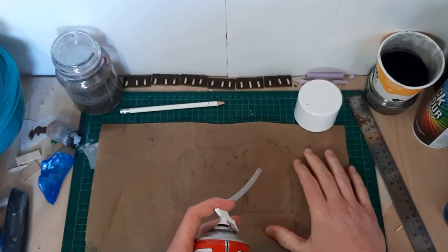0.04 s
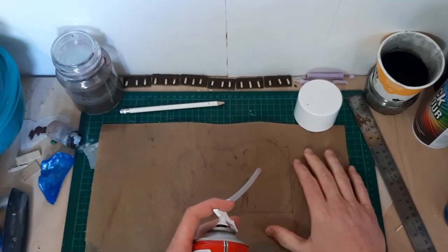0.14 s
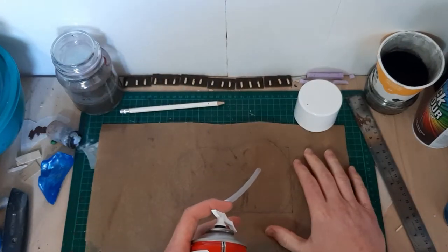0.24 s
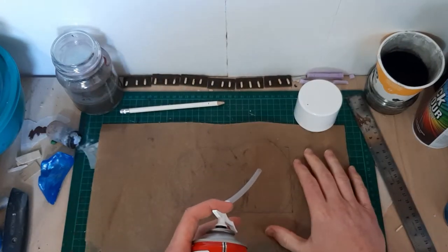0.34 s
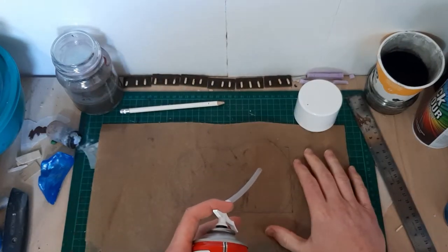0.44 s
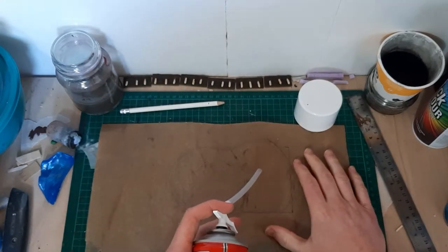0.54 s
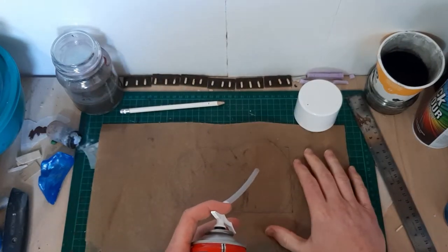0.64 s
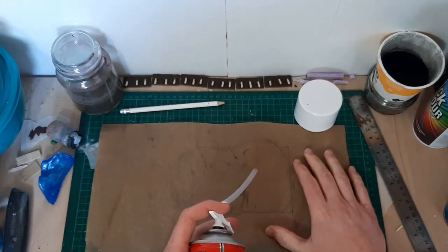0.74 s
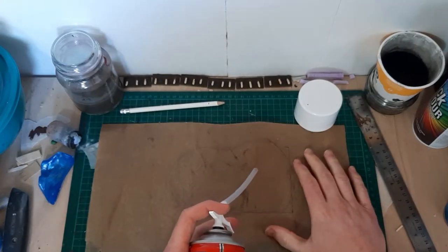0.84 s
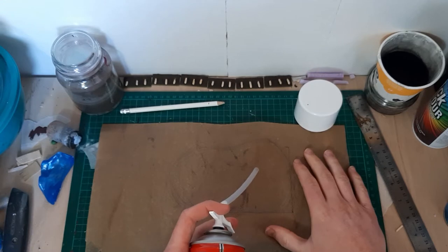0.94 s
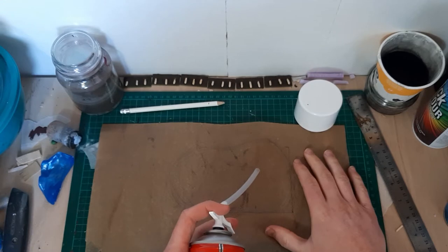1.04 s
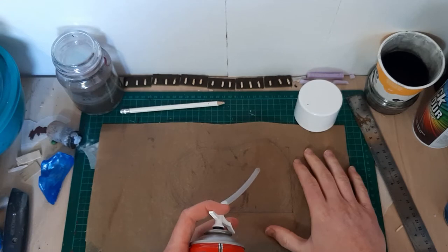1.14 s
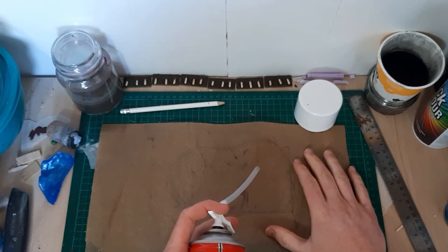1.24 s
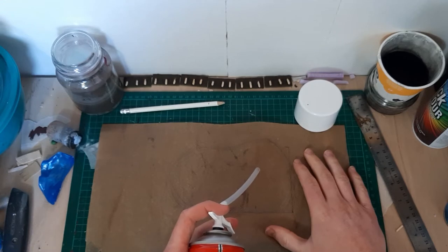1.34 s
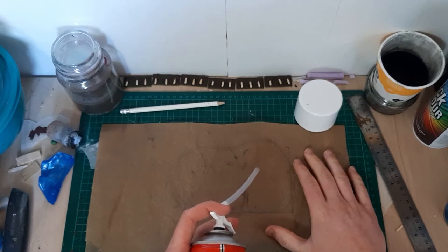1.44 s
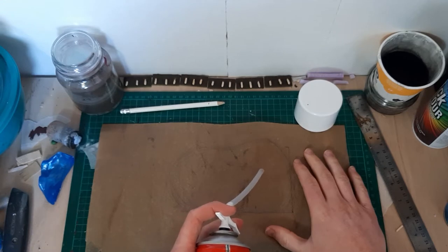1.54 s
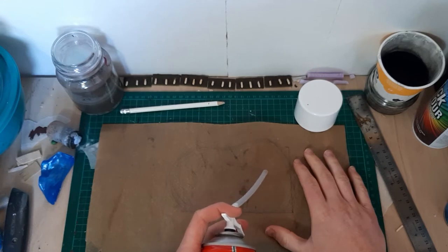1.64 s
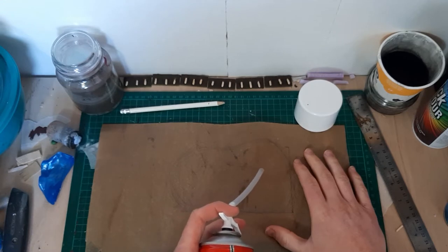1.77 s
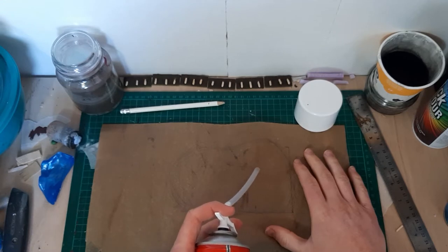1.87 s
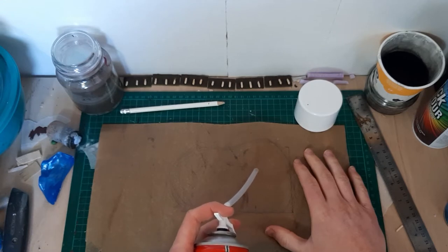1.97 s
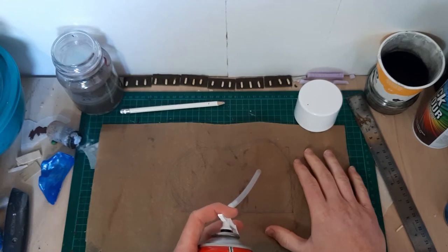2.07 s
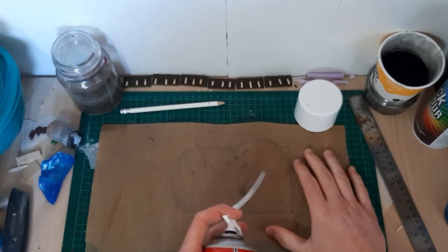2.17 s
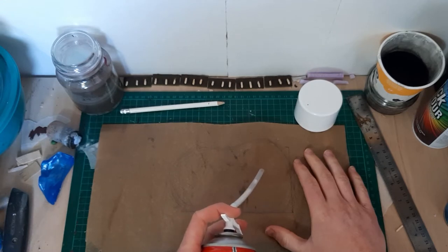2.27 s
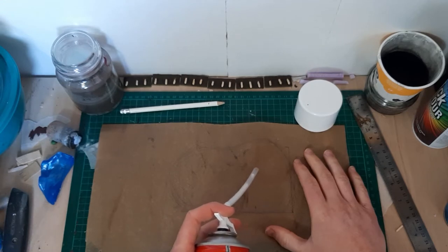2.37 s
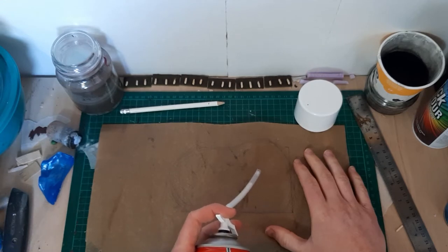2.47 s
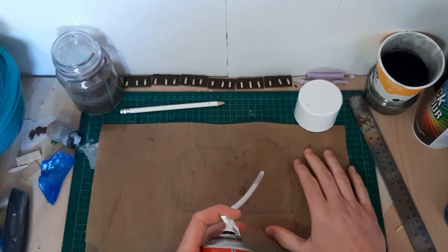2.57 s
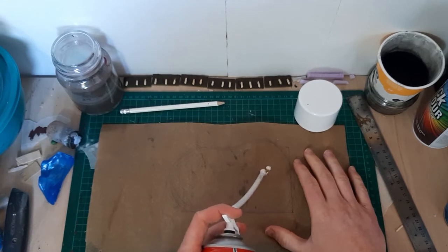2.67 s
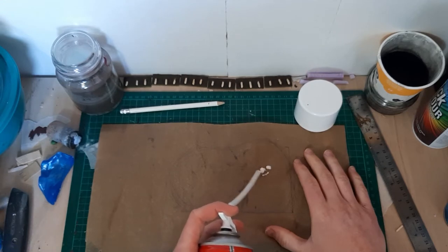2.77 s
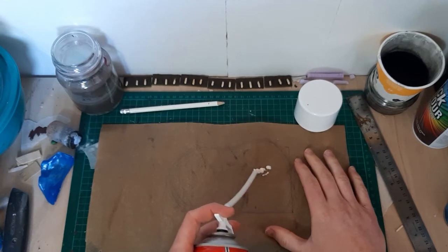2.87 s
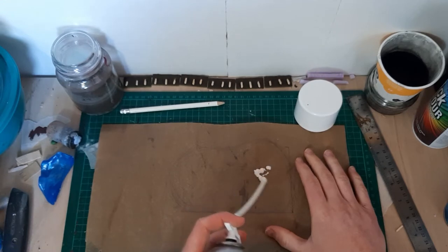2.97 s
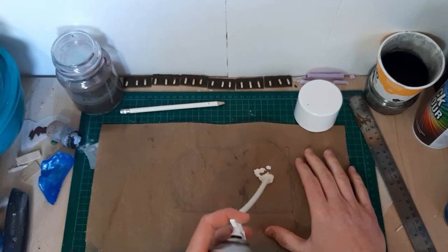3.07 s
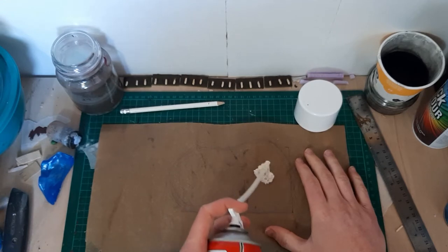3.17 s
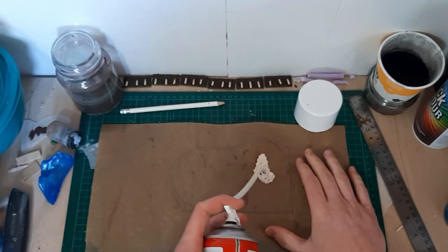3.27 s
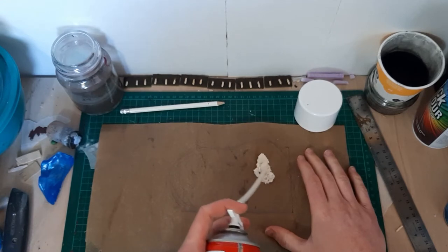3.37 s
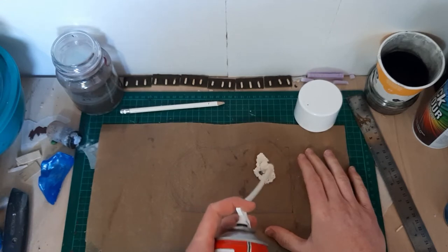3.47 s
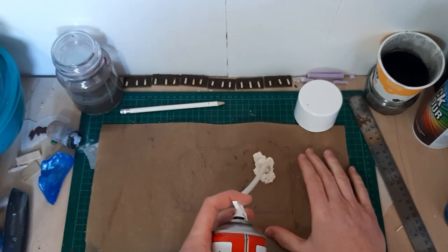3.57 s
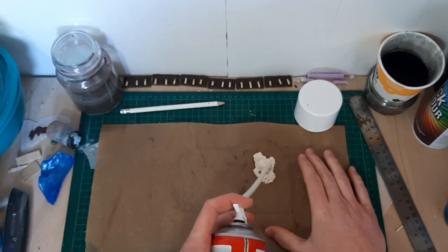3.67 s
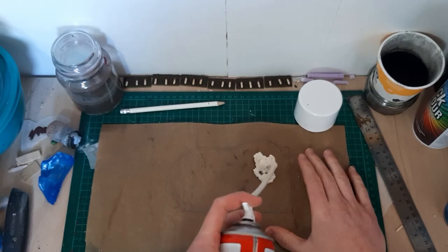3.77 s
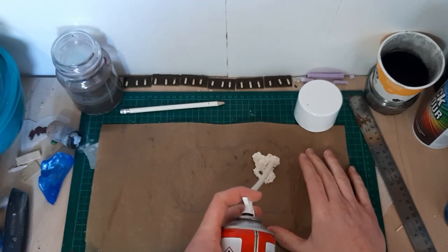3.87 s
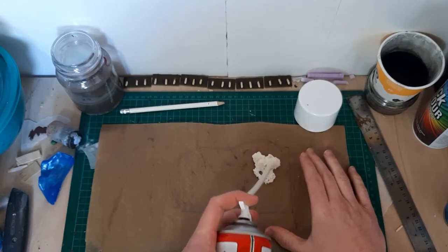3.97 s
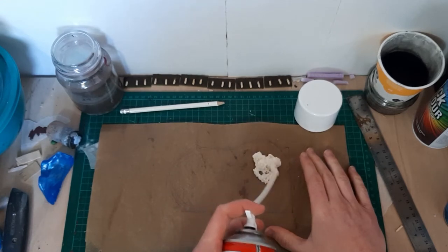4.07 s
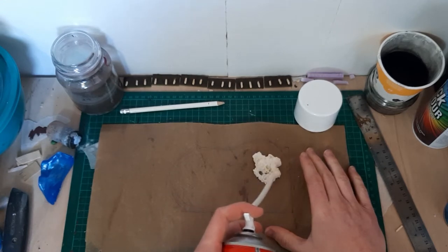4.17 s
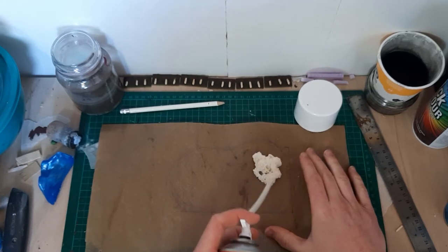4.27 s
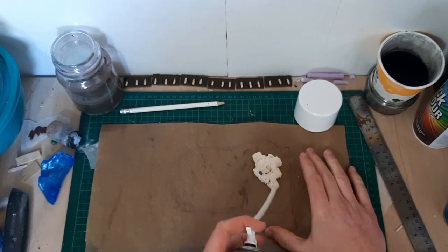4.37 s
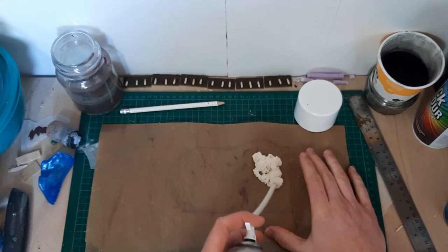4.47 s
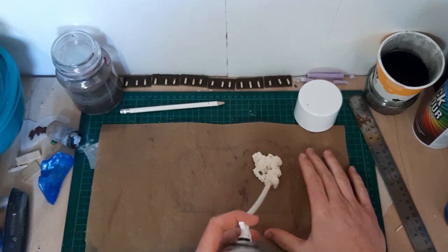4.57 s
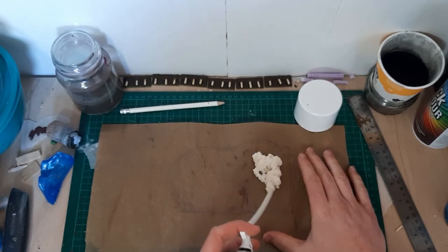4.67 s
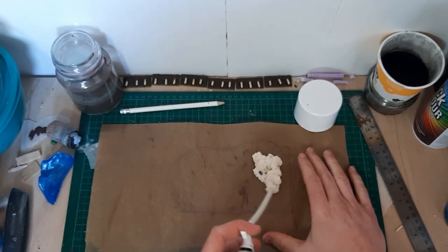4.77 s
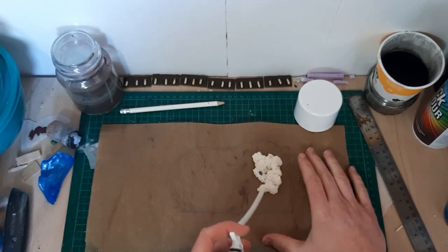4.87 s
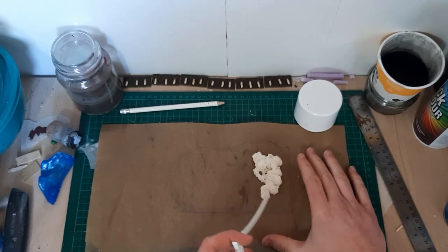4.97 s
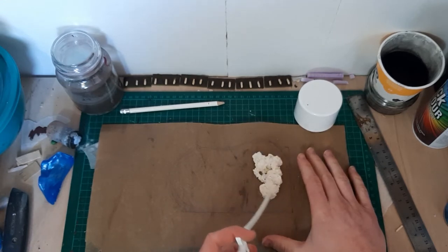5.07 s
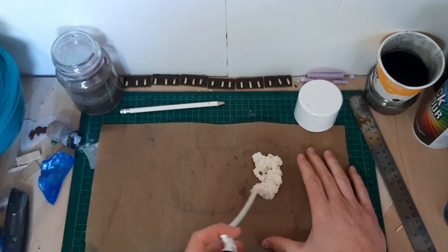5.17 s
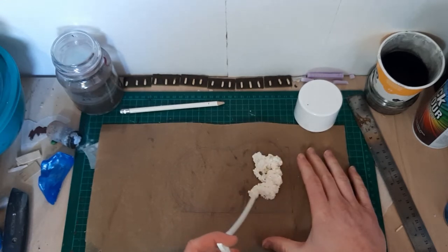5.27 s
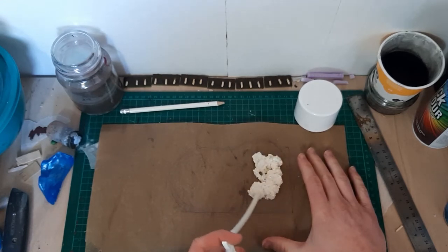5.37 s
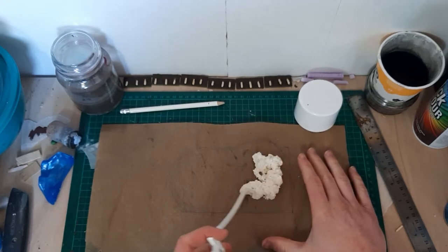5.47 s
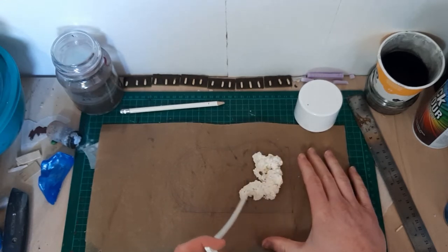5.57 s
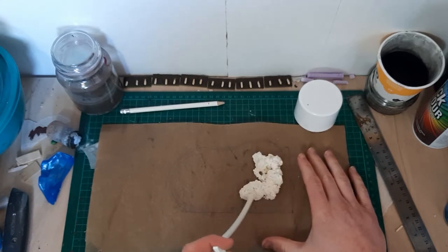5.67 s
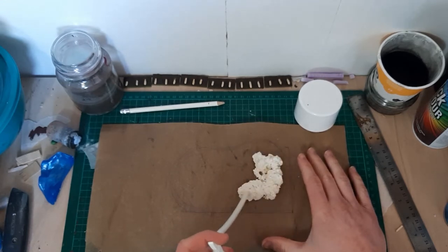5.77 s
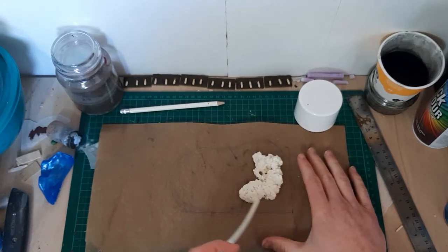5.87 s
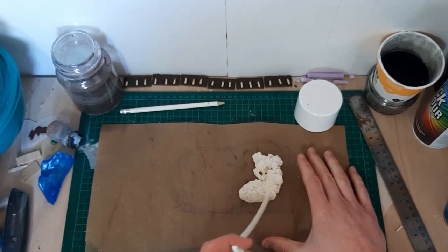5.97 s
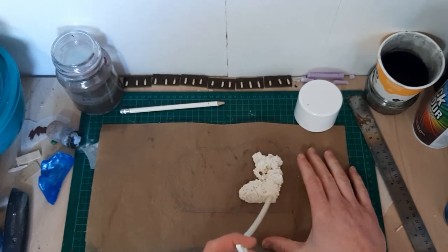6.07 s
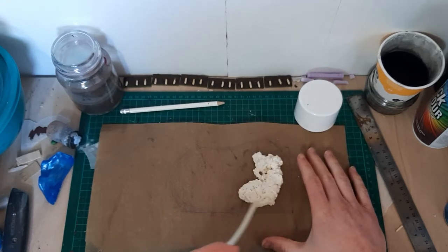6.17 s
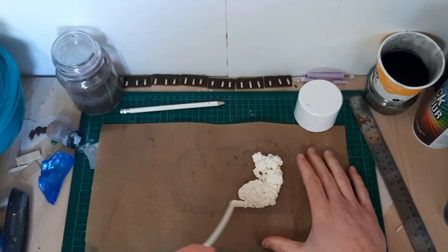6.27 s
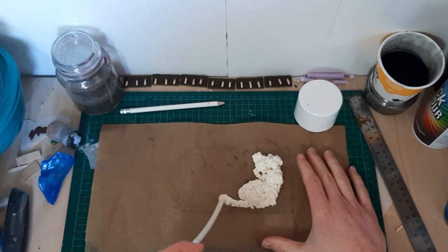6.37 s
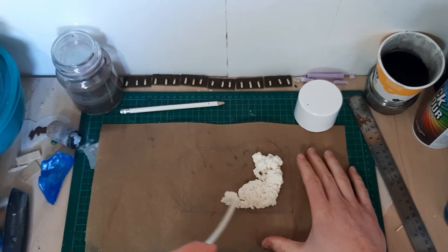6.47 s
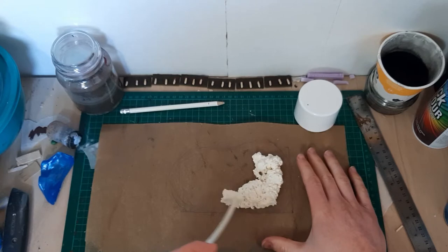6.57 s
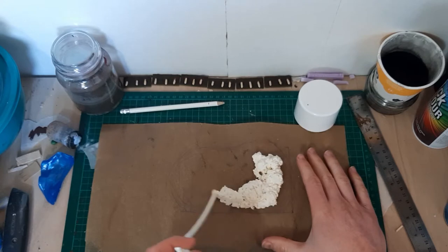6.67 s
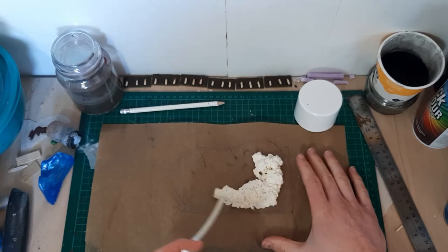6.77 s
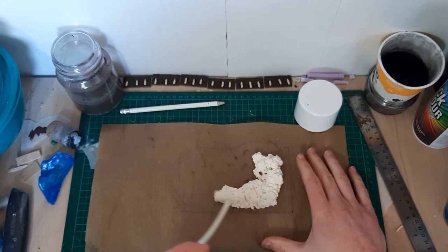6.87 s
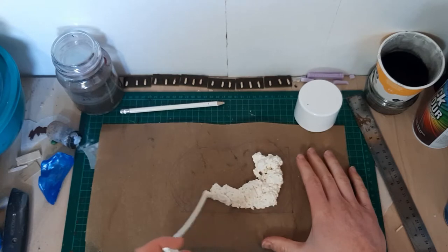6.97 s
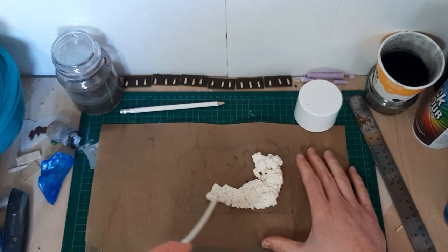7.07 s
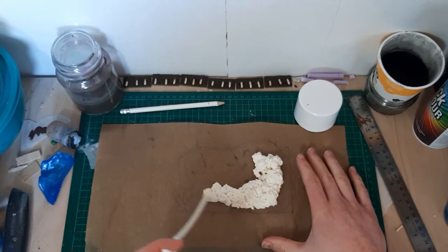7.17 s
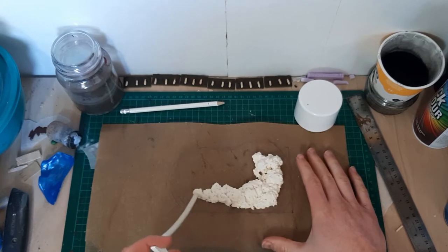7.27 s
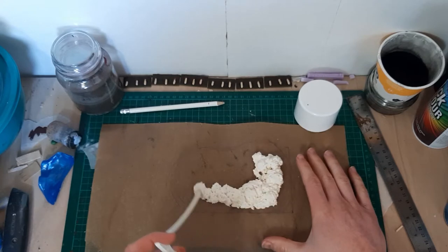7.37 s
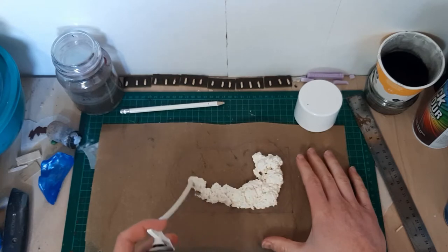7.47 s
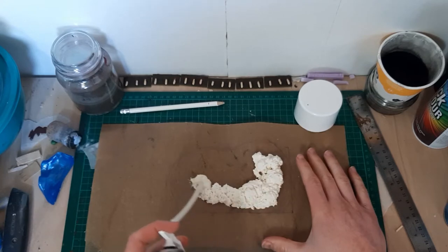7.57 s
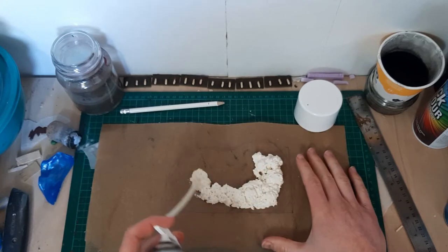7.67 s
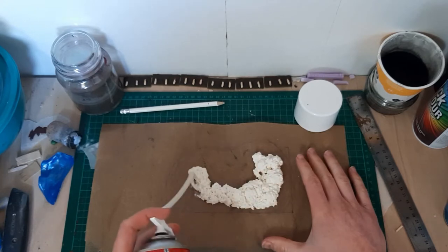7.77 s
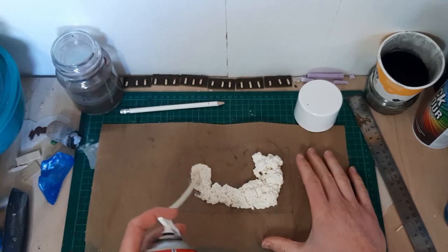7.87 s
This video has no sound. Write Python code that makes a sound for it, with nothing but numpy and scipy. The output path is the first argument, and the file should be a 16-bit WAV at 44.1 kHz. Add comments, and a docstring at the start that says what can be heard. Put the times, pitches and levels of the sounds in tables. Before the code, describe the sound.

Close in a small quiet room, faint low air noise and barely audible chirps are followed by small finger rustles and trigger ticks. Gas starts leaking, the can gives a brief low hum and soft knock, then foam blasts out in a loud sputtering burst. Irregular hissing spurts continue with wet crackles, bubble pops and sharp little snaps, over a seeping hiss, in stereo with a slight lean to the right.

```python
"""A spray can pushes expanding foam through a straw in a small quiet room, over faint air noise.
Faint chirps, modulated sines, come first; grainy rustles and resonant noise are fingers and trigger.
Gas leaks through the straw's resonance; jolts ring the can's low modes, a wavering hum just above them.
Surges of coloured noise carry the hiss, the sputter of bursting pockets and a low rush of foam;
decaying sines are the largest bursts. Noise puffs with clicks, from the first rustle on, are snaps."""
import sys
import numpy as np
from scipy import signal
from scipy.fft import rfft, irfft, next_fast_len
from scipy.io import wavfile
from scipy.ndimage import uniform_filter1d

SR = 44100
rng = np.random.default_rng(int(sys.argv[2]) if len(sys.argv) > 2 else 0)


def unload_audio(sound):
    """Save the sound as a 16-bit wav file, at the path given as the first command line argument."""
    columns = np.transpose(np.atleast_2d(sound))
    # keep every value between -1 and 1, then stretch to whole-number steps
    steps = np.round(np.clip(columns, -1, 1) * 32767)
    wavfile.write(sys.argv[1], SR, steps.astype(np.int16))


N = 349272

# spectrum of small sharp sounds, snaps and rustles: (frequency [Hz], relative density [dB per Hz])
SNAP_SPECTRUM = [(1000, -24), (2000, -2), (2800, 2), (4000, 8.5), (5200, 10), (7000, 8), (8000, 3),
                 (12000, -7), (16000, -10)]


def from_db(db):
    """Amplitude ratio by the decibel law: 20 dB is a factor of ten."""
    return 10 ** (np.asarray(db) / 20)


def rms_one(x):
    """Normalise the root mean square, so that a later gain sets the effective level."""
    return x / np.sqrt(np.mean(x ** 2) + 1e-20)


def in_time(rows):
    """Envelopes by linear interpolation of dB; -120 dB outside, but ends after 7 s are held."""
    times, *columns = np.transpose(rows)
    t = np.arange(N) / SR
    return [np.interp(t, times, column, left=-120, right=column[-1] if times[-1] > 7 else -120)
            for column in columns]


def at_hz(points, hz):
    """Interpolate along log frequency, as the ear spaces pitch."""
    frequencies, values = np.array(points).T
    return np.interp(np.log(hz + 1), np.log(frequencies), values)


def colour(x, spectrum):
    """Linear filtering: multiply the Fourier spectrum by a gain in dB."""
    length = x.shape[-1]
    size = next_fast_len(length + 4096)
    gain = from_db(at_hz(spectrum, np.fft.rfftfreq(size, 1 / SR)))
    return irfft(rfft(x, size) * gain, size)[..., :length]


def drift(corner_hz):
    """Slow random modulation: noise through two equal one-pole low-passes, spread 1."""
    step = 20  # samples between computed points
    r = np.exp(-2 * np.pi * corner_hz * step / SR)
    slow = signal.lfilter([1], [1, -2 * r, r * r], rng.standard_normal(N // step + 2002))
    slow = slow[2000:]  # leave out the filter's start
    return np.interp(np.arange(N) / step, np.arange(len(slow)), rms_one(slow))


def swells(s, rise, fall, peak_db, steepness=1):
    """Superposition of rounded envelopes with near-exponential flanks, summed as amplitude."""
    step = 20  # samples between computed points
    t = np.arange(0, N + step, step)[:, None] / SR - s
    flank = np.maximum(np.where(t < 0, rise, fall), .001)
    fade = np.exp(-(np.abs(t) / flank) ** steepness)
    rounded = 2 * fade / (1 + fade ** 2)
    total = (from_db(peak_db) * rounded).sum(axis=1)
    return np.interp(np.arange(N) / step, np.arange(len(t)), total)


def resonance(x, hz, width):
    """Damped resonator: a pole pair of the given bandwidth, near unit gain at its centre."""
    r = np.exp(-np.pi * width / SR)
    poles = [1, -2 * r * np.cos(2 * np.pi * hz / SR), r * r]
    return signal.lfilter(np.array([1, 0, -1]) * (1 - r * r) / 2, poles, x + 1e-18)


def ring(clicks, hz, t60):
    """Impulse response of a damped mode: a unit click starts a decaying sine of height 1."""
    r, w = from_db(-60 / (t60 * SR)), 2 * np.pi * hz / SR
    return signal.lfilter([0, np.sin(w)], [1, -2 * r * np.cos(w), r * r], clicks + 1e-18)


def pair(length):
    """Spatial coherence: two noises, alike in the bass and unrelated in the treble."""
    # (frequency [Hz], left-right likeness [0 to 1])
    coherence = [(60, 0.87), (130, 0.91), (290, 0.59), (640, 0.13), (1400, 0), (3000, 0)]
    size = next_fast_len(length)
    alike = np.clip(at_hz(coherence, np.fft.rfftfreq(size, 1 / SR)), -1, 1)
    mid, side = rfft(rng.standard_normal((2, size)))
    both = np.sqrt(.5 + alike / 2) * mid + np.sqrt(.5 - alike / 2) * side * [[1], [-1]]
    return irfft(both, size)[:, :length]


def patchy(x, shared_db, own_db, own_hz):
    """Band-wise modulation: each half octave flickers with the others and also alone."""
    together = drift(29.0)
    edges = 160 * 2 ** np.arange(0, 7.1, .5)
    out = 0
    for k, (low, high) in enumerate(zip(edges, edges[1:])):
        band = signal.sosfilt(signal.butter(2, [low, high], "band", fs=SR, output="sos"), x)
        # neighbouring bands alternate in sign
        out = out + band * (-1) ** k * from_db(shared_db * together + own_db * drift(own_hz))
    return out


def grains(per_s, spread_db):
    """Shot noise: independent random clicks of uneven size and either sign."""
    sizes = from_db(spread_db * np.minimum(rng.exponential(1, N), 5))
    signs = rng.choice([-1, 1], N)
    return rms_one(sizes * signs * (rng.random(N) < per_s / SR))


def flow():
    """Unsteady flow: a seep with surges on top sets the hiss, sputter and rush levels in dB."""
    # gas that seeps out between surges: (time [s], hiss level [dB])
    seep = [(1.4, -95.5), (1.51, -67.5), (1.7, -60), (1.8, -59.5), (1.92, -52), (2.0, -49), (2.3, -59),
            (2.55, -80), (2.95, -61), (3.5, -50), (4.1, -61), (4.75, -49.5), (5.6, -50.5), (6.2, -46.5),
            (6.55, -46.5), (7.0, -49.5), (7.37, -56), (7.6, -49), (7.92, -49)]
    # foam surging through the straw: (peak time [s], rise [s], fall [s],
    # hiss level [dB], sputter level [dB], rush level [dB])
    surges = [(1.938, 0.0041, 0.1, -62, -58.5, -50), (2.055, 0.018, 0.021, -56, -46.5, -59),
              (2.172, 0.053, 0.037, -43.5, -43, -39), (2.375, 0.022, 0.022, -52.5, -83, -69),
              (2.415, 0.03, 0.038, -52.5, -79, -72), (2.669, 0.026, 0.14, -36, -38, -45),
              (2.779, 0.076, 0.025, -38, -35.5, -36), (2.878, 0.032, 0.012, -46, -58, -49.9),
              (3.0, 0.025, 0.055, -53, -59, -71), (3.14, 0.033, 0.018, -55, -36.5, -41),
              (3.204, 0.063, 0.066, -24.5, -26, -30), (3.34, 0.005, 0.053, -56, -50.5, -52.5),
              (3.55, 0.037, 0.042, -57, -73, -81), (3.652, 0.03, 0.1, -53.5, -62, -50.5),
              (3.834, 0.057, 0.11, -43.5, -44.5, -44.5), (4.277, 0.064, 0.07, -52, -60.5, -57),
              (4.518, 0.041, 0.046, -40.5, -41.5, -43.5), (4.576, 0.012, 0.026, -81.5, -39, -53),
              (4.85, 0.019, 0.055, -49.5, -59.9, -57), (5.152, 0.044, 0.043, -38, -34.5, -38.5),
              (5.281, 0.0065, 0.033, -79, -49.5, -51), (5.42, 0.029, 0.016, -49, -47.5, -51.5),
              (5.465, 0.02, 0.052, -48.5, -43.5, -43), (5.733, 0.042, 0.01, -50, -55, -78),
              (5.779, 0.039, 0.048, -46, -48, -48), (6.003, 0.016, 0.046, -44.5, -51.5, -53),
              (6.06, 0.02, 0.031, -66, -41, -43), (6.43, 0.059, 0.11, -57, -55, -51.5),
              (6.695, 0.053, 0.033, -42, -40, -42.5), (6.95, 0.033, .05, -60, -77, -82),
              (7.222, 0.059, 0.085, -43, -49.5, -49.5), (7.425, 0.027, 0.047, -49, -47, -50.5),
              (7.506, 0.042, 0.03, -41.5, -43.5, -43.5), (7.717, 0.022, 0.092, -59, -63, -55),
              (7.91, 0.014, .03, -55, -69, -58)]
    steepness = 1.235  # 1 = exponential flanks, more = steeper
    sputter_lag_s, sputter_width = 0.0077, 0.78  # the sputter peaks after the hiss and is briefer
    rush_lag_s = 0.014
    seep_db, = in_time(seep)
    s, rise, fall, hiss_db, sputter_db, rush_db = np.transpose(surges)
    hiss = from_db(seep_db) + swells(s, rise, fall, hiss_db, steepness)

    # each seep part: its level while the seep hisses at -50 dB, then dB per dB of hiss
    sputter = from_db(-67.5 + 4.24 * (seep_db + 50))
    sputter = sputter + swells(s + sputter_lag_s, rise * sputter_width, fall * sputter_width,
                               sputter_db, steepness)
    low = from_db(-58.5 + 1.64 * (seep_db + 50))
    low = low + swells(s + rush_lag_s, rise, fall, rush_db, steepness)
    return 20 * np.log10(np.array([hiss, sputter, low]) + 1e-12)


def gas(level_db):
    """Turbulent jet noise: broadband hiss with a fine crackle of tiny cells tearing."""
    # (frequency [Hz], relative density [dB per Hz])
    spectrum = [(400, -73), (1200, -18), (2000, -7.5), (2700, -1.5), (3500, 0.5), (5500, 4), (8000, 0.5),
                (12000, -8.5), (16000, -7)]
    # gain of the hiss above about 9 kHz: (time [s], level over its usual colour [dB])
    treble = [(1.4, -7), (1.88, 2), (1.96, 4), (2.4, -2.5), (2.7, 3.5), (3.2, 7), (4.2, 7), (5.0, 4.5),
              (6.0, 1.5), (7.92, 1.5)]
    jet = rng.standard_normal(N) + 0.9 * grains(per_s=700.0, spread_db=4.5)
    spread_out = jet + 3.2 * pair(N)  # a wide source
    hiss = patchy(spread_out, shared_db=1.12, own_db=0.97, own_hz=13.0)
    hiss = rms_one(colour(hiss, spectrum))
    top = signal.sosfiltfilt(signal.butter(4, 9000, "high", fs=SR, output="sos"), hiss)
    return from_db(level_db + 1.1 * drift(160)) * (hiss + (from_db(in_time(treble)[0]) - 1) * top)


def foam(level_db):
    """Pressure release: gas pockets burst densely at the straw's mouth, the largest as damped sines."""
    # (frequency [Hz], relative density [dB per Hz])
    spectrum = [(200, -16), (350, -9.5), (550, -4.5), (900, 1), (1500, -3.5), (2200, -3.5), (2900, -6.5),
                (4500, -14), (8000, -20.5)]
    # large pockets bursting: (time [s], level before the room [dB], pitch [Hz])
    bursts = [(2.634, -40.5, 666), (2.668, -33, 1790), (2.7, -17.5, 2460), (2.755, -23, 980),
              (3.11, -23, 1620), (3.149, -23, 690), (3.206, -18, 830), (3.211, -22, 330),
              (3.243, -13, 2440), (3.345, -25.5, 1580), (3.721, -38, 308), (3.816, -29, 1200),
              (4.512, -32, 2030), (4.582, -26, 1580), (5.091, -43, 665), (5.124, -34, 1190),
              (5.281, -39.5, 930), (5.462, -40, 960), (5.809, -31, 1800), (6.057, -24, 1220),
              (6.181, -39, 1210), (6.582, -34.5, 950), (6.649, -25, 1810), (6.697, -32, 931),
              (7.257, -33, 2000), (7.418, -29.5, 308), (7.477, -34, 2060)]
    ring_cycles = 12  # cycles in which a burst pocket decays by 60 dB
    sputter = 1.22 * pair(N) + grains(per_s=1500., spread_db=2.5)
    sputter = patchy(sputter, shared_db=1.5, own_db=2.5, own_hz=25.0)
    out = from_db(level_db) * rms_one(colour(sputter, spectrum))
    t = np.arange(SR // 20) / SR
    for s, burst_db, hz in bursts:
        pop = np.sin(2 * np.pi * hz * t) * from_db(burst_db - 60 * t * hz / ring_cycles)
        at = round(s * SR)
        out[:, at:at + len(t)] += pop[:N - at]
    return out


def rush(level_db):
    """Low-frequency flow noise: foam pushes lumpily through the straw and lands on paper."""
    # (frequency [Hz], relative density [dB per Hz])
    spectrum = [(30, -36), (60, -36), (90, -2.5), (130, -1.5), (200, -6), (320, 0), (450, -8), (800, -21.5)]
    return from_db(level_db + 1.0 * drift(24)) * rms_one(colour(pair(N), spectrum))


def snaps():
    """Impulsive excitation: a click and sharp crack, with a bright, quickly decaying noise puff."""
    # bubbles and trigger ticks: (time [s], reference level [dB], puff's 60 dB decay time [s],
    # click level over the reference [dB])
    events = [(0.621, -57, 0.06, -4), (0.7851, -60, 0.06, -4), (0.9265, -58, 0.065, -4),
              (1.1014, -64, 0.06, -4), (1.226, -55.5, 0.065, -4), (1.3083, -57.5, 0.06, -4),
              (1.462, -57.5, 0.06, -4), (1.584, -50, 0.045, -2), (1.623, -47, 0.087, -4),
              (1.6888, -45.5, 0.12, -6), (1.8676, -41.5, 0.068, -4), (2.454, -35.5, 0.07, -7.5),
              (2.528, -71, .02, -19), (2.548, -46, .02, -4), (2.577, -54, .03, -4),
              (2.591, -37.5, 0.13, -5), (2.971, -19.5, 0.028, -10), (4.625, -30, .04, -2),
              (4.724, -39, .03, -6), (4.945, -35, .04, -2), (5.901, -34, 0.17, -4), (6.335, -32, 0.053, -4),
              (6.3817, -28, 0.036, -4), (6.4386, -32, 0.065, -4), (7.025, -32, .02, -6),
              (7.478, -27, .04, -12), (7.482, -17, 0.014, 4), (7.6081, -23.5, 0.029, -12),
              (7.6958, -31, 0.05, -8), (7.724, -34, 0.036, -8), (7.8522, -25.5, 0.022, -10)]
    puff_db, crack_db = -7.5, -6.5  # relative to the reference level
    crack_t60_s, onset_s = 0.014, 0.00095
    out, clicks, t = np.zeros(N), np.zeros(N), np.arange(SR // 5) / SR
    puffs = rms_one(colour(rng.standard_normal((len(events), len(t))), SNAP_SPECTRUM))
    for (s, level_db, t60, click_db), puff in zip(events, puffs):
        at = round(s * SR)
        shape = from_db(puff_db - 60 * t / t60) + from_db(crack_db - 60 * t / crack_t60_s)
        shape = shape * np.minimum(t / onset_s, 1)
        out[at:at + len(t)] += (puff * from_db(level_db) * shape)[:N - at]
        clicks[at + SR // 2000] = from_db(level_db + click_db)  # half a millisecond in
    return out + colour(clicks, SNAP_SPECTRUM)


def can():
    """Modal vibration: soft jolts ring low modes; a hum wavers a little above as the valve opens."""
    # the valve jolts the can: (time [s], level of the click [dB])
    jolts = [(2.057, -31), (2.089, -35.5)]
    # (frequency [Hz], level [dB], 60 dB decay time [s])
    modes = [(396, 1, 0.06), (342, -1, 0.045)]
    # the can hums as the valve opens: (time [s], level [dB])
    hum_level = [(1.942, -55), (1.949, -30), (1.966, -37), (1.972, -46), (1.99, -40.5), (2.04, -47.5),
                 (2.068, -46), (2.075, -36), (2.083, -46), (2.12, -41), (2.14, -54)]
    hum_hz = 423.4
    clicks = np.zeros(N)
    clicks[[round(s * SR) for s, _ in jolts]] = from_db(np.array(jolts)[:, 1])
    soft = signal.lfilter([.06], [1, -.94], clicks)
    ringing = sum(from_db(db) * ring(soft, hz, t60) for hz, db, t60 in modes)
    phase = 2 * np.pi * np.cumsum(hum_hz * (1 + 0.01 * drift(29.0))) / SR
    hum = np.sin(phase) * from_db(1.7 * drift(43))
    return ringing + uniform_filter1d(from_db(in_time(hum_level)[0]), size=60) * hum


def leak():
    """Pipe resonance: gas leaking through the still empty straw is noise filtered twice."""
    # (time [s], level [dB])
    level = [(1.46, -90), (1.526, -76), (1.694, -68), (1.834, -83), (1.9, -71), (1.94, -72)]
    straw_hz, width_hz = 2720, 840  # width of each pass
    breath = resonance(rng.standard_normal(N), straw_hz, width_hz)
    return from_db(in_time(level)[0]) * rms_one(resonance(breath, straw_hz, width_hz))


def creak():
    """Frictional excitation: noise drives three resonances as the trigger flexes."""
    # (frequency [Hz], width [Hz])
    tones = [(2110, 37), (4730, 37), (1390, 60)]
    # (peak time [s], rise [s], fall [s], first, second and third tone's level [dB])
    flexes = [(0.635, .006, .03, -72, -74, -91), (0.68, 0.023, 0.025, -68, -79, -79),
              (.755, .015, .012, -76, -88, -84), (0.81, 0.023, 0.022, -81, -72.5, -95),
              (0.935, .006, 0.009, -76, -84, -85)]
    rub = pair(N)
    s, rise, fall, *levels = np.transpose(flexes)
    return sum(swells(s, rise, fall, db) * rms_one(resonance(rub, hz, width))
               for (hz, width), db in zip(tones, levels))


def rustle():
    """Friction as dense micro-impacts: finger skin rustles on the plastic trigger."""
    # (peak time [s], rise [s], fall [s], level [dB])
    shifts = [(0.668, .02, 0.018, -65.5), (0.8, 0.052, 0.044, -73), (0.935, .004, 0.05, -72.5),
              (1.13, .06, 0.056, -76), (1.228, .003, 0.036, -72), (1.314, 0.0086, 0.026, -70.5)]
    skin = rms_one(colour(grains(per_s=4000., spread_db=4.5), SNAP_SPECTRUM))
    return swells(*np.transpose(shifts)) * skin


def chirps():
    """Frequency modulation: faint short whistles waver independently in the two channels."""
    # (peak time [s], time from peak to 1/e [s], mean pitch [Hz], level [dB])
    whistles = [(0.072, .015, 4900, -80), (0.145, .015, 4000, -77), (0.183, 0.034, 5700, -82),
                (.13, .04, 4780, -85), (.25, 0.055, 4800, -86), (0.323, .025, 4430, -82),
                (.37, .03, 3700, -80), (.43, 0.022, 4770, -80), (.43, .02, 4300, -81),
                (.44, 0.028, 3950, -85), (0.496, .018, 4000, -76), (0.882, .025, 3950, -80),
                (1.17, .025, 4800, -74)]
    waver = 1 + .02 * np.array([drift(150), drift(150)])  # spread as a share of the pitch
    out = np.zeros((2, N))
    for s, half, hz, level_db in whistles:
        at = np.arange(max(round((s - 2 * half) * SR), 0), round((s + 2 * half) * SR))
        envelope = from_db(level_db) * np.exp(-((at / SR - s) / half) ** 2)
        out[:, at] += envelope * np.sin(2 * np.pi * hz * np.cumsum(waver[:, at], axis=1) / SR)
    return out


def air():
    """Stationary background noise: a coloured, partly coherent pair with a slow faint drift in level."""
    # (frequency [Hz], relative density [dB per Hz])
    spectrum = [(15, -18), (25, -21.5), (55, 1.5), (242, -25.5), (317, -32), (363, -34), (545, -32.5),
                (591, -30.5), (887, -43), (3250, -47), (3920, -43), (7310, -52), (16000, -45)]
    return from_db(-58.5 + 0.32 * drift(0.69)) * rms_one(colour(pair(N), spectrum))


def room(x):
    """Convolution with direct sound and a diffuse decaying tail, after fluctuating resonances."""
    # (frequency [Hz], width [Hz], level [dB], left minus right [dB])
    hollows = [(826, 39, -1, 11), (1554, 72, 0.5, -3.5), (1970, 110, -3, -4.5)]
    t60_s, tail_db, right_lag_s = .16, -2.5, .00007
    t = np.arange(SR // 3) / SR
    tail = pair(len(t)) * from_db(-60 * t / t60_s) * (t > .0015)
    answer = from_db(tail_db) * tail / np.sqrt(np.sum(tail ** 2) / 2)  # tail energy relative to direct
    answer[[0, 1], [0, round(right_lag_s * SR)]] += 1
    near = x
    for hz, width, db, pan_db in hollows:
        swinging = x * from_db(4 * drift(4.8))  # spread in dB, corner in Hz
        sides = from_db(db + np.array([[.5], [-.5]]) * pan_db)
        near = near + resonance(swinging, hz, width) * sides
    return signal.fftconvolve(near, answer, axes=1)[:, :N] * from_db(-1.5)


def scene():
    """Superposition: near sources pass through the room, then the others add directly."""
    # spectral balance of the channels: (frequency [Hz], left minus right [dB])
    lean = np.array([(60, -2.5), (150, -5), (380, -3.5), (950, -5), (2380, -2.5), (5980, -3.5), (15000, 0)])
    hiss_db, sputter_db, rush_db = flow()
    near = gas(hiss_db) + foam(sputter_db) + snaps() + rustle() + leak()
    left, right = room(near) + rush(rush_db) + can() + creak() + air() + chirps()
    return np.array([colour(left, lean * [1, .5]), colour(right, lean * [1, -.5])])


def record(dry):
    """Linear transfer: the microphone port has a deep notch, and a steep low-pass cuts the top."""
    # (frequency [Hz], gain [dB])
    port = [(7600, 0.5), (8100, -10.5), (8300, -25), (8950, -16.5), (9400, -9), (10500, -4.5), (12000, 2)]
    cutoff_hz = 15900
    low_pass = signal.ellip(14, .5, 75, cutoff_hz, fs=SR, output="sos")
    return signal.sosfilt(low_pass, colour(dry, port))


dry = scene()
out = record(dry)
unload_audio(out)
```